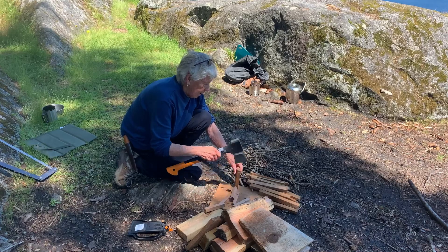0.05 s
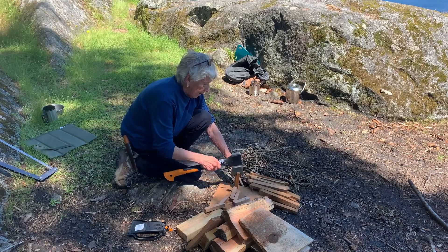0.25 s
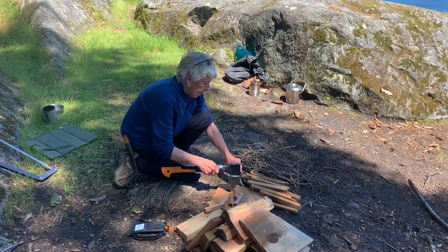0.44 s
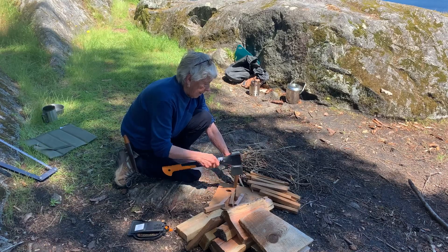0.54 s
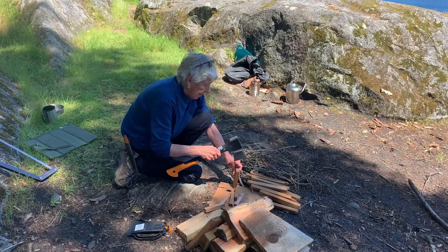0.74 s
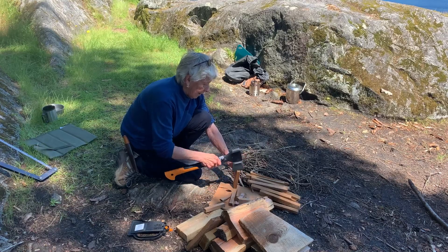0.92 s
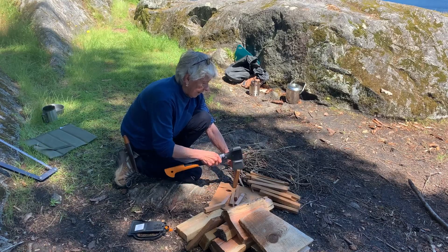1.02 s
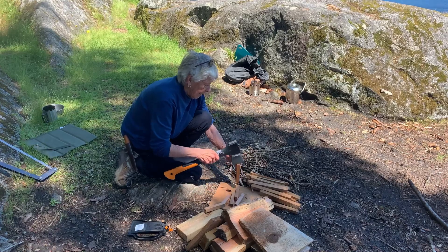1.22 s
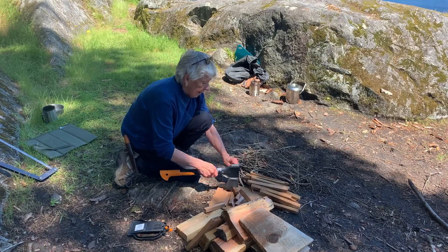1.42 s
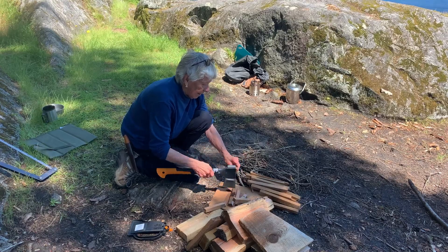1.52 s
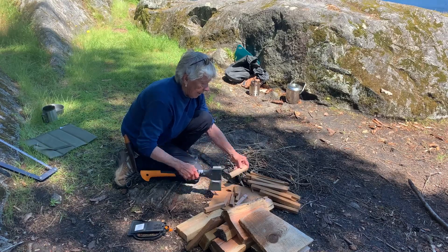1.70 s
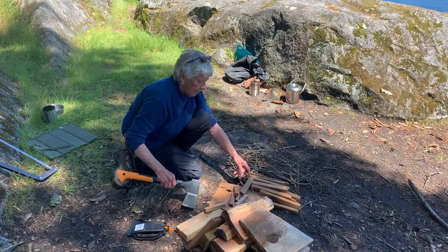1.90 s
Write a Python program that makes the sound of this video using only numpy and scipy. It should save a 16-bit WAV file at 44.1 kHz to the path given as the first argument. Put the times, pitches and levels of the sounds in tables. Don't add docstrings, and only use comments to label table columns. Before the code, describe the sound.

A hatchet splits dry kindling in three sharp cracking blows, with sticks clattering and toppling outdoors

```python
import sys
import numpy as np
from scipy import signal
from scipy.fft import rfft, irfft
from scipy.io import wavfile
from scipy.ndimage import uniform_filter1d

SR = 44100
rng = np.random.default_rng(int(sys.argv[2]) if len(sys.argv) > 2 else 0)


def field_ratio(decibels):
    return 10 ** (np.asarray(decibels, dtype=float) / 20)


def bounce(signal):
    frames = np.transpose(np.atleast_2d(signal))
    limited = np.clip(frames, -1, 1)
    pcm = np.round(limited * 32767).astype(np.int16)
    wavfile.write(sys.argv[1], SR, pcm)


N = 85995

# pitch_hz,
# level_db, t60_s
STICK_MODES = [(650, -4, 0.046), (788, 1.5, 0.043), (845, 0.5, 0.045), (931.3, 7.5, 0.034),
               (1040, 1.5, 0.075), (1118.4, 4.5, 0.061), (1277, -7, 0.067), (1426, -3.5, 0.027),
               (1643, 1.5, 0.022), (1594, -1, 0.096), (1878, -13, 0.031), (2277, 10, 0.019),
               (2648, 6, 0.054), (3270, 0, 0.0083)]
# pitch_hz, level_db
CRACK_COLOUR = [(400, 6.5), (1500, -37), (2700, 12.5), (4000, 0.5), (6000, -2), (10000, -18),
                (16000, -39.5)]
FREE_DAMP, HELD_DAMP = 3.2, 3.26
SPLINTERS_PER_S, TREBLE_HZ = 900, 6000
LEAD_SAMPLES = 4


def evened(x):
    return x / np.sqrt(np.mean(x ** 2) + 1e-20)


def read(points, hz):
    f, value = np.transpose(points)
    return np.interp(np.log(hz + 1), np.log(f + 1), value)


def add(mix, start_s, sound):
    part = mix[round(start_s * SR):][:len(sound)]
    part += sound[:len(part)]


def shaped(x, gain):
    return irfft(rfft(x) * gain(np.fft.rfftfreq(x.shape[-1], 1 / SR)), x.shape[-1])


def ring(modes, t, damp=1):
    hz, db, t60 = np.transpose(modes)[:, :, None]
    partials = field_ratio(db - 60 * damp * t / t60) * np.sin(2 * np.pi * hz * t)
    return partials.sum(0) * (1 - np.exp(-t / 0.001)) ** 2


def blow(crack_db, thud_db, start_hz, splinter_db):
    # pitch_hz, level_db, t60_s
    ground_modes = [(86.3, -16.5, 0.18), (146.2, 0.5, 0.045), (252, -12.5, 0.027)]
    end_hz, sag_s, rise_s, thud_t60 = 182, 0.003, 0.0016, 0.042
    crack_t60, splinter_t60, treble_t60 = 0.018, 0.18, 0.3
    t = np.arange(16000) / SR

    hz = end_hz + (start_hz - end_hz) * np.exp(-t / sag_s)
    thud = -np.sin(2 * np.pi * np.cumsum(hz) / SR)
    thud *= (1 - np.exp(-t / rise_s)) * field_ratio(-60 * t / thud_t60)
    thud = field_ratio(thud_db) * (2 * thud + ring(ground_modes, t) * (1 - np.exp(-t / 0.0069)))

    noise, u = rng.standard_normal((2, len(t))), rng.random((2, len(t)))
    snaps = u[0] < SPLINTERS_PER_S / SR
    sizes = field_ratio(np.minimum(-3.0 * np.log(u[1] + 1e-9), 8))
    grains = noise[1] * (0.35 + snaps * sizes)
    colour = lambda f: field_ratio(read(CRACK_COLOUR, f))
    crack = evened(shaped(noise[0], colour)) * field_ratio(crack_db - 60 * t / crack_t60)
    crack *= np.minimum(t / 0.00061, 1)

    tear = evened(shaped(grains, colour)) * field_ratio(splinter_db)
    low = shaped(tear, lambda f: 1 / (1 + (f / TREBLE_HZ) ** 4))
    tear = low * field_ratio(-60 * t / splinter_t60) + (tear - low) * field_ratio(-60 * t / treble_t60)
    return thud + crack + tear


def blows():
    # start_s, crack_db, thud_db, thud_start_hz, splinter_db
    strokes = [
        (0.2179, -8.5, -6.5, 561.6, -30),
        (0.8056, -20.5, -10, 620, -40),
        (1.2512, -8, -7, 605, -29.5),
    ]
    out = np.zeros(N)
    for start_s, *settings in strokes:
        add(out, start_s, blow(*settings))
    return out


def knock(peak_db, centre_hz, contact_s, free):
    reach_oct, reach_floor_db, detune = 0.55, -17.5, 0.018
    linger_db, linger_damp = -19, 0.9
    clack_share, clack_oct = 0.3 if free else 0.6, 0.5
    t, luck = np.arange(6000) / SR, rng.standard_normal(800)
    early = t[:700]

    u = early / max(contact_s, 2e-4)
    touch = np.minimum(u * 8, 1) * np.exp(-u * 2.41) * luck[100:]
    touch = touch / np.linalg.norm(touch)

    wood = np.array(STICK_MODES)
    wood[:, 0] *= 1 + detune * luck[:len(wood)]
    felt = abs(np.exp(2j * np.pi * wood[:, :1] * early) @ touch)
    octaves = np.log2(wood[:, 0] / centre_hz)
    reach_db = np.maximum(-6 * (octaves / reach_oct) ** 2, reach_floor_db)
    wood[:, 1] += reach_db - 20 * np.log10(felt + 0.3)

    body = ring(wood, t, FREE_DAMP if free else HELD_DAMP)
    if free:
        body += field_ratio(linger_db) * ring(wood, t, linger_damp)
    body = signal.fftconvolve(body, touch)[:len(t)]

    edges_hz = centre_hz * 2 ** (clack_oct * np.array([-1, 1]))
    band = signal.butter(4, edges_hz, "band", fs=SR, output="sos")
    soft_touch = touch * np.minimum(early / 0.001, 1)
    clack = signal.sosfilt(band, np.pad(soft_touch, (0, len(t) - 700)))
    body = body / abs(body).max() + clack_share * clack / abs(clack).max()
    body = signal.sosfilt(signal.butter(4, centre_hz / 2, "high", fs=SR, output="sos"), body)
    return field_ratio(peak_db) * body / abs(body).max()


def sticks():
    # start_s, peak_db, centre_hz, contact_s
    held_knocks = [(0.2152, -4.5, 1190, 0.0047), (.2181, -2, 990, 0.00067), (0.2184, -2.5, 1670, 0.002),
                   (0.2221, -7.5, 1500, 0.0021), (0.2257, -18.5, 1310, 0.0024), (.238, -27, 970, .01),
                   (0.8025, -9.5, 1200, 0.00043), (0.805, -5, 704, 0.003), (0.8085, -16, 1300, 0.0027),
                   (0.815, -15.5, 1016, 0.011), (.831, -33.5, 1050, 0.011), (1.2475, 3.5, 1220, 0.0022),
                   (1.2511, 2, 1430, 0.0038), (1.257, -15, 927, 0.0093), (1.29, -28.5, 1092, .012),
                   (1.2665, -16, 2812, 0.0026)]
    # start_s, peak_db, centre_hz, contact_s
    free_knocks = [(0.2821, -16.5, 1400, 0.0038), (0.2903, -7.5, 1300, 0.0061), (0.2943, -9.5, 1600, 0.0024),
                   (0.3032, 2, 1600, 0.004), (0.309, 0, 1300, 0.0025), (0.3105, -3.5, 2690, 0.0045),
                   (0.3125, -2.5, 1500, 0.0028), (0.316, -12.5, 1110, 0.002), (.327, -26.5, 1150, .006),
                   (0.344, -19.5, 1300, 0.0013), (.354, -26, 1500, 0.0081), (0.366, -25, 1150, .008),
                   (0.387, -30.5, 950, 0.0024), (.4, -34.5, 1050, .006), (.413, -41.5, 1200, .006),
                   (1.308, -16, 920, 0.00077), (1.3166, -19.5, 1153, 0.013), (1.325, -24.5, 1200, .008),
                   (1.327, -23, 1700, 0.0028), (1.3321, -14.5, 1200, 0.0036), (1.3646, -17, 1150, 0.0033),
                   (1.3685, -14.5, 1550, 0.006), (1.376, -26.5, 1050, 0.004), (1.3914, -16.5, 894, 0.0023),
                   (1.396, -25, 1100, 0.0072), (1.8914, -21, 1630, 0.00218), (1.9009, -21.5, 980, 0.0039),
                   (1.9035, -12.5, 1608, 0.0029), (1.912, -20, 1150, 0.003), (1.92, -26, 1150, 0.0018),
                   (.0075, -21, 1480, 0.0029), (0.0525, -22.5, 1120, 0.0039), (0.059, -29, 1500, 0.0071),
                    (0.1642, -22.5, 1210, 0.001), (0.425, -24.5, 1156, 0.0079), (.437, -28.5, 1100, 0.0103),
                    (0.4855, -18.5, 1270, 0.00072), (0.854, -27, 1010, 0.0053), (.872, -22, 800, 0.0017),
                    (0.8881, -18, 1220, 0.0016), (.908, -27.5, 845, 0.0036), (0.9529, -15.5, 1730, 0.00126),
                    (0.987, -27, 1030, 0.0061), (1.006, -48, 1520, 0.0014), (1.027, -20, 1446, 0.0085),
                    (1.029, -20.5, 1520, 0.0042), (1.053, -32.5, 1000, 0.0093),
                    (1.236, -29.5, 1230, 0.0035), (1.455, -38, 1015, 0.0066), (1.553, -30, 1504, 0.0098),
                    (1.652, -19.5, 1017, 0.0102), (1.689, -20.5, 1040, 0.008)]
    out = np.zeros(N)
    for start_s, *settings in held_knocks:
        add(out, start_s, knock(*settings, free=False))
    for start_s, *settings in free_knocks:
        add(out, start_s, knock(*settings, free=True))
    return out


def blade():
    # start_s, level_db
    strikes = [
        (0.221, -55),
        (0.808, -32),
        (0.9538, -31),
        (1.256, -24),
        (1.335, -38),
        (1.392, -45),
        (1.904, -46.5),
    ]
    pitch_hz, t60_s = 2695, 0.14
    t, out = np.arange(12000) / SR, np.zeros(N)
    for start_s, level_db in strikes:
        add(out, start_s, ring([(pitch_hz, level_db, t60_s)], t))
    return out


def scrape(level_db, hold_s):
    t, noise = np.arange(2000) / SR, rng.standard_normal((2, 2000))
    low_hz, decay_t60 = 1500, 0.014
    top_hz = max(SR / 2 + 660 * (level_db + 10), TREBLE_HZ)
    grains = noise[0] * field_ratio(1.6 * evened(uniform_filter1d(noise[1], 40)))

    def colour(f):
        band = 1 / (1 + (f / top_hz) ** 4) / (1 + (low_hz / (f + 1)) ** 4)
        return field_ratio(read(CRACK_COLOUR, f)) * band

    envelope = field_ratio(level_db - 60 * np.maximum(t - hold_s, 0) / decay_t60) * np.minimum(t / 0.001, 1)
    return evened(shaped(grains, colour)) * envelope


def grit():
    # start_s, level_db, hold_s
    scrapes = [
        (0.2824, -33, 0.019),
        (0.3041, -15, 0.0057),
        (0.3088, -15.5, .004),
        (0.9533, -39, 0.0034),
        (1.268, -26, 0.0034),
        (1.33, -36.5, 0.0031),
        (1.365, -41.5, 0.0049),
        (1.894, -40, 0.0011),
        (1.9, -43.5, 0.013),
    ]
    out = np.zeros(N)
    for start_s, *settings in scrapes:
        add(out, start_s, scrape(*settings))
    return out


def rattle():
    # start_s, level_db, t60_s
    rattles = [
        (0.325, -47.5, 1),
        (0.814, -35, 0.099),
        (0.961, -44.5, 0.2),
        (1.279, -57, 0.35),
        (1.367, -48, 0.38),
        (1.872, -55.5, 0.69),
    ]
    chips_per_s = 1500
    t, level, out = np.arange(N) / SR, np.zeros(N), np.zeros(N)
    for start_s, db, t60 in rattles:
        add(level, start_s, field_ratio(db - 60 * t / t60))
    u = rng.random((3, N))
    sizes = field_ratio(np.minimum(-3.5 * np.log(u[1] + 1e-9), 9))
    hits = level * (u[0] < chips_per_s / SR) * sizes
    for k, mode in enumerate(STICK_MODES):
        near = np.abs(u[2] * len(STICK_MODES) - k) < 2.5
        out += signal.oaconvolve(hits * near, ring([mode], t[:3000], FREE_DAMP))[:N]
    return out


def debris():
    # start_s, level_db, t60_s
    settling = [(.205, -60, 0.16), (.286, -39.5, 0.072), (.317, -45.5, 0.35), (.485, -56, 0.092),
                (.812, -50, 0.2), (.955, -56, 0.17), (1.238, -45.5, .1), (1.272, -52, 0.35),
                (1.325, -47.5, .1), (1.37, -56.5, 0.31), (1.865, -63, 0.65), (1.9, -56, 0.17)]
    # pitch_hz, level_db
    crackle_colour = [(2000, -31), (3000, -4), (3600, -10), (4100, -0.5), (4600, -8), (5200, 1.5),
                      (6000, -9), (8000, -29)]
    t, level, u = np.arange(N) / SR, np.zeros(N), rng.random((3, N))
    for start_s, db, t60 in settling:
        add(level, start_s, field_ratio(db - 60 * t / t60) * (1 - np.exp(-t / 0.004)))
    sizes = field_ratio(np.minimum(-4.0 * np.log(u[2] + 1e-9), 8) + 8)
    grains = (2 * u[0] - 1) * (1 + (u[1] < SPLINTERS_PER_S / SR) * sizes)
    return level * evened(shaped(grains, lambda f: field_ratio(read(crackle_colour, f))))


def landings():
    # start_s, level_db, pitch_hz, t60_s
    bumps = [(0.274, -30.5, 89.5, .2), (0.295, -31, 204, .04), (0.31, -24, 237, .05),
             (0.334, -29, 240, 0.033), (0.363, -41.5, 265, .04), (.395, -40, 204, 0.043),
             (.974, -38, 945, 0.035), (1.03, -38, 706, 0.21), (1.291, -31.5, 89.5, 0.29),
             (1.343, -24.5, 248, 0.035), (1.353, -29.5, 155.6, 0.046)]
    t, out = np.arange(4000) / SR, np.zeros(N)
    for start_s, db, hz, t60 in bumps:
        add(out, start_s, ring([(hz, db, t60)], t))
    return out


def echo(x):
    # pitch_hz, t60_s
    decay_times = [(300, 0.2), (2000, 0.12), (5000, 0.074), (6500, 0.075)]
    echo_db, top_hz = -21.5, 6000
    taps = np.zeros((2, 16000))
    at = np.arange(100, 15960, 20) + rng.integers(0, 20, (2, 793))
    np.put_along_axis(taps, at, rng.choice([-1., 1.], at.shape), 1)
    hz, t, z = signal.stft(taps, SR, nperseg=256)
    decay = field_ratio(-60 * t / read(decay_times, hz)[:, None])
    tail = signal.istft(z * decay, SR, nperseg=256)[1]
    tail = shaped(tail / np.linalg.norm(tail[0]), lambda f: 1 / (1 + (f / top_hz) ** 8))
    return field_ratio(echo_db) * signal.fftconvolve(x[None], tail, axes=1)[:, :N]


def ports(left, right):
    # pitch_hz, left_over_right_db
    left_excess = [(350, 0.5), (700, 5), (1050, 5), (1250, 13.5), (1900, 10), (2350, 33.5), (3100, 5.5),
                   (4800, 2), (15000, 13)]
    # pitch_hz, phase_rad
    phase_turn = [(150, -.25), (420, -.45), (1200, -1.3), (1400, .1), (2050, 0), (2500, 1.8), (3300, .5),
                  (4500, -.9), (15000, -.5)]

    def port(f):
        phase = read(phase_turn, f) + 2 * np.pi * f * LEAD_SAMPLES / SR
        return field_ratio(-read(left_excess, f)) * np.exp(1j * phase)

    return np.array([left, shaped(right, port)])


def engine():
    # order, level_db
    orders = [(2, -61), (4, -58), (5, -55.5), (6, -54), (8, -71)]
    engine_hz, whine_hz, whine_db, octave_db = 23.8, 5470, -79, -88
    t = np.arange(N) / SR
    out = field_ratio(whine_db) * np.sin(2 * np.pi * whine_hz * t)
    out += field_ratio(octave_db) * np.sin(4 * np.pi * whine_hz * t)
    for order, db in orders:
        waver = evened(uniform_filter1d(uniform_filter1d(rng.standard_normal(N), 5000), 2000))
        out += field_ratio(db + 0.5 * waver) * np.sin(2 * np.pi * (order * engine_hz * t + rng.random()))
    return out


def hush():
    # pitch_hz, level_db (per Hz)
    hush_colour = [(25, -28.5), (50, 0), (140, -3.5), (300, -16.5), (1000, -18), (1950, -31), (3300, -39.5),
                   (8200, -56.5)]
    # pitch_hz, width_hz, level_db
    resonances = [(1450, 150, -13), (2570, 220, -22.5), (5362, 130, -26), (15750, 500, -32),
                  (10920, 1400, -47), (7000, 900, -48.5)]
    # pitch_hz, likeness (0 to 1)
    coherence = [(100, 0.74), (700, 0.11), (15000, 0.16)]
    # pitch_hz, left_over_right_db
    hush_excess = [(150, 2.5), (700, 2.5), (2500, 12), (8000, 1.5)]
    hush_db, patch_db, swell_db = -47.5, 3, -3

    frames, hz = N // 256 + 5, np.fft.rfftfreq(1024, 1 / SR)
    a, b, c, d, patches = rng.standard_normal((frames, 513, 5)).T
    patches = evened(uniform_filter1d(uniform_filter1d(patches, 12, 0), 10, 1))
    swell = evened(uniform_filter1d(rng.standard_normal(frames), 20))

    power = field_ratio(2 * read(hush_colour, hz))
    for f, width_hz, db in resonances:
        power += field_ratio(2 * db) / (1 + (2 * (hz - f) / width_hz) ** 4)

    same = np.clip(read(coherence, hz), -1, 1)[:, None]
    left, other = a + 1j * b, c + 1j * d
    lead = field_ratio(-read(hush_excess, hz)) * np.exp(2j * np.pi * hz * LEAD_SAMPLES / SR)
    right = lead[:, None] * (same * left + np.sqrt(1 - same ** 2) * other)
    z = np.array([left, right])
    z *= np.sqrt(power)[:, None] * field_ratio(patch_db * patches + swell_db * swell)
    return field_ratio(hush_db) * evened(signal.istft(z, nperseg=1024, noverlap=768)[1][:, :N])


def scene():
    wood = blows() + sticks() + blade() + grit() + rattle() + debris() + landings()
    low_cut = signal.butter(2, 65, "high", fs=SR, output="sos")
    wood = signal.sosfilt(low_cut, wood)
    left, right = wood + echo(wood)
    return ports(left, right) + engine() + hush()


def low_pass(x):
    return signal.sosfilt(signal.butter(12, 16240, fs=SR, output="sos"), x)


def record(dry):
    mix = np.clip(dry, -1.0, 1.0)
    return low_pass(mix)


dry = scene()
out = record(dry)
bounce(out)
```